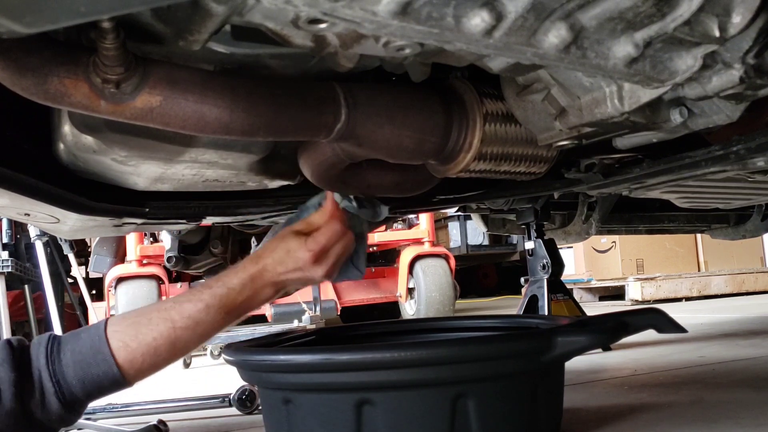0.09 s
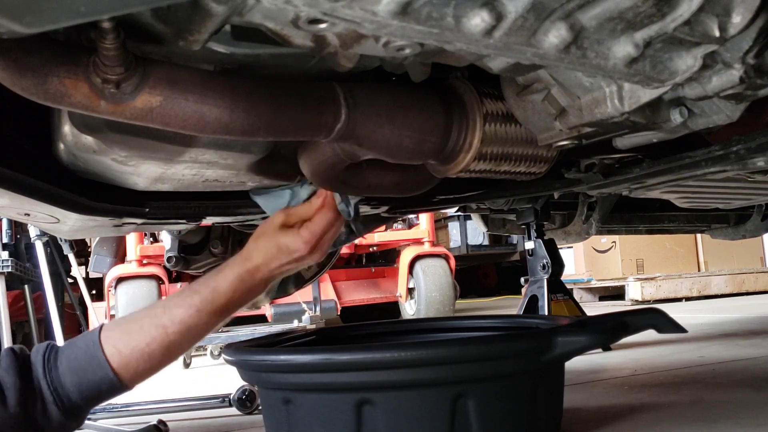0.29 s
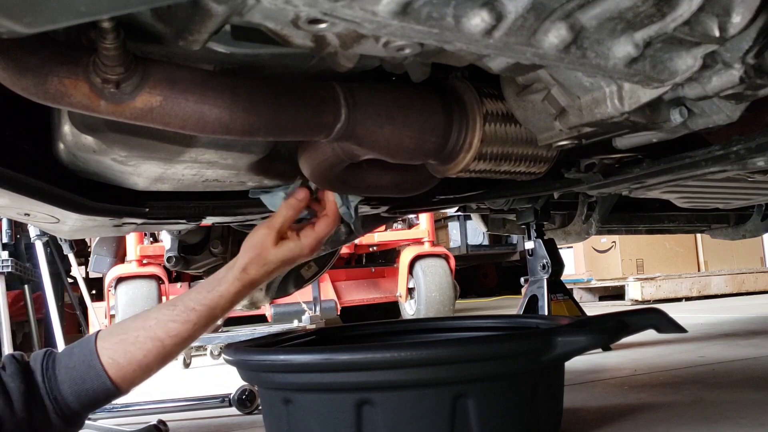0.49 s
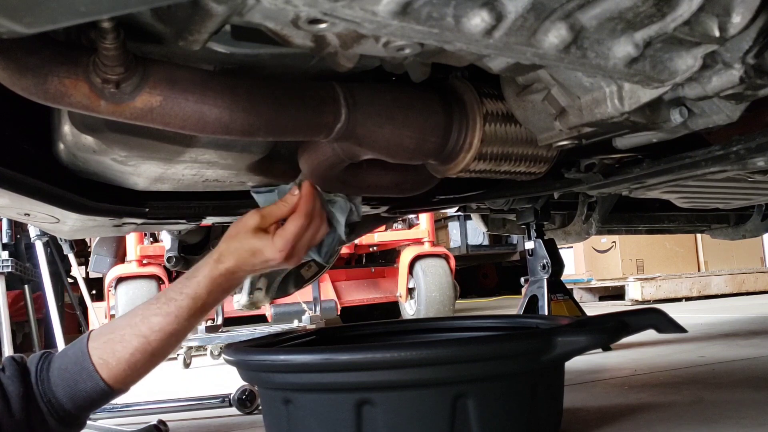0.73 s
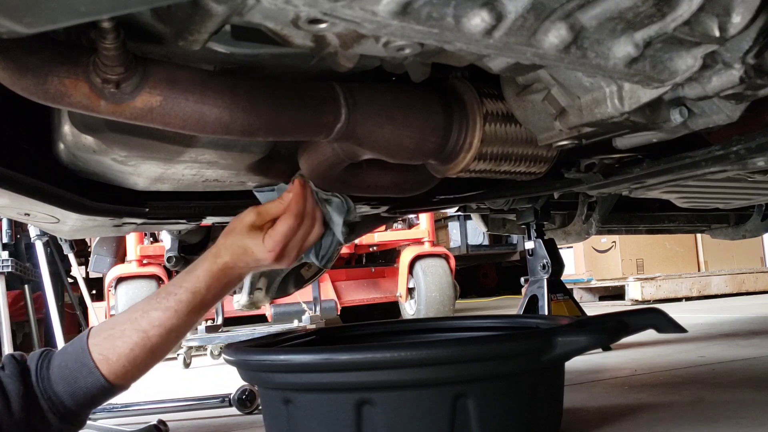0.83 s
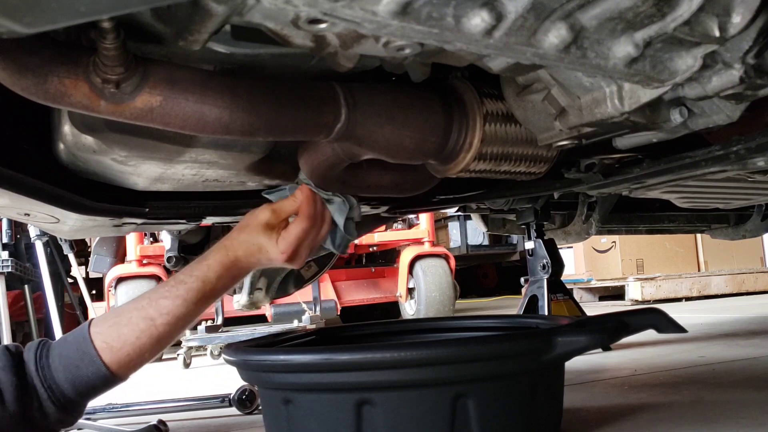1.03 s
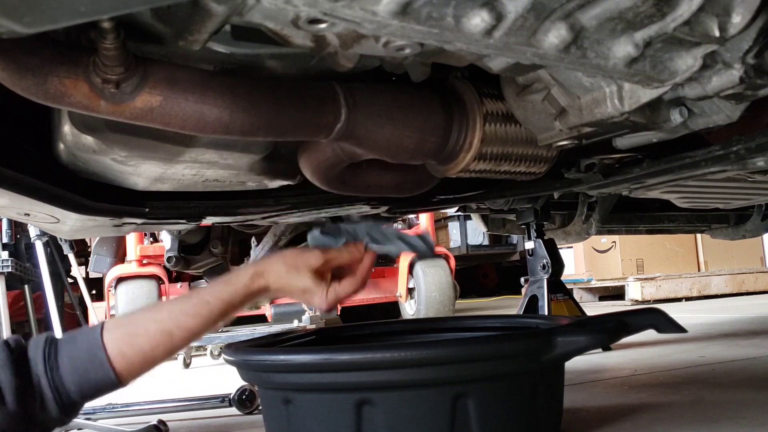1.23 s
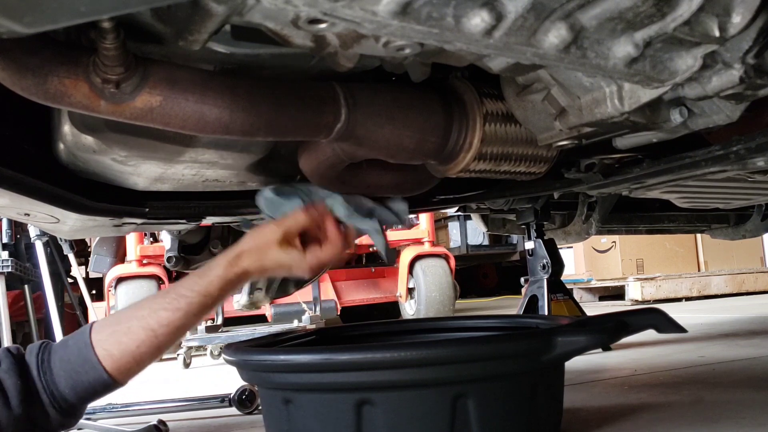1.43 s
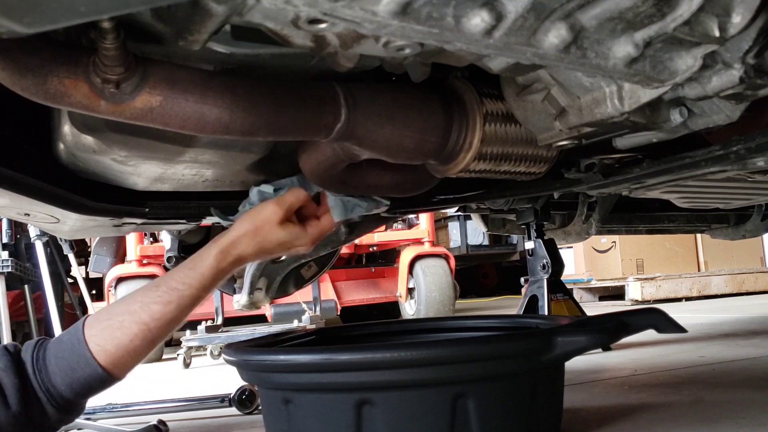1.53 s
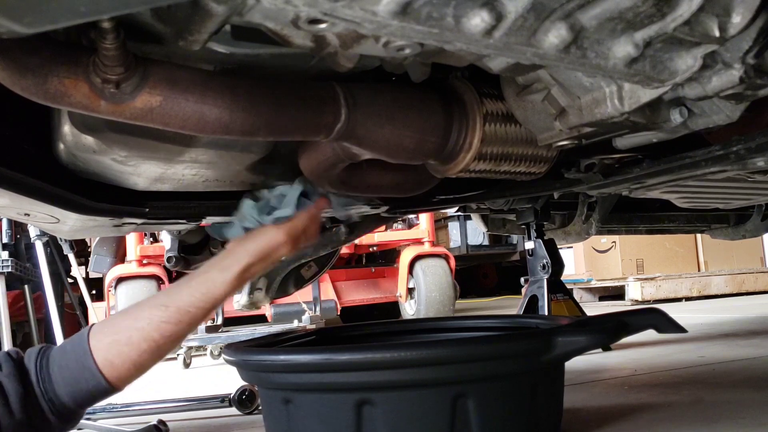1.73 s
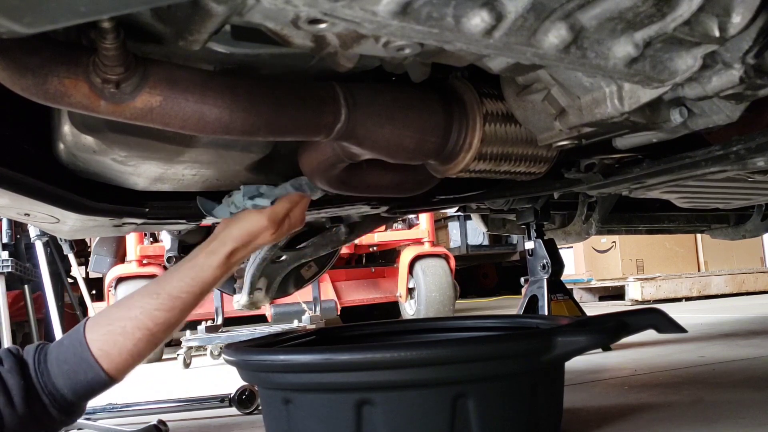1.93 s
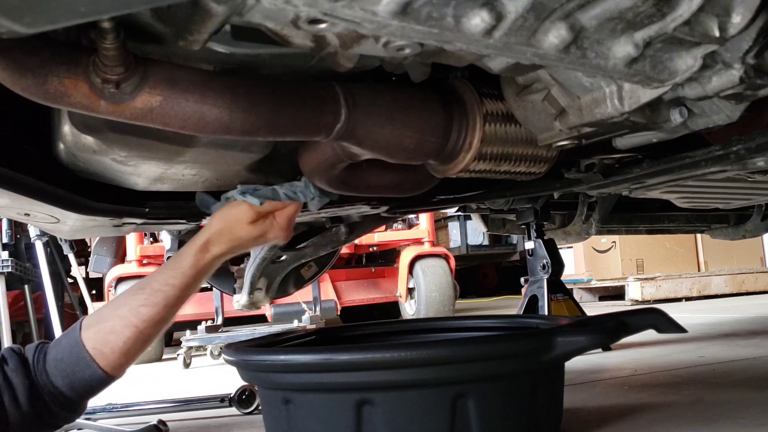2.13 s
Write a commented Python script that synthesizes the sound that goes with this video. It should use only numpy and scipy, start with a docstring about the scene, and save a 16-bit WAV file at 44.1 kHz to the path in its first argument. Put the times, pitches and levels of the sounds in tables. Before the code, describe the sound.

Soft, hissy rubbing of cloth on metal comes and goes under a car. An early hard clink stands out, with faint touches later, over low rumble and thin air, closely miked with slight garage reflections.

```python
"""A hand wipes a cloth rag to and fro over a steel oil pan under a car in a quiet garage.
The rubbing is shaped noise in hiss, scuff and dull bands, and it stirs the pan's damped modes.
One hard knock and a few light touches click and ring the pan and a slower bracket.
The underside and garage add decaying-noise reflections, different at each microphone.
A low rumble and thin air noise, both steady-coloured noise, lie beneath."""
import sys
import numpy as np
from scipy import signal
from scipy.fft import rfft, irfft, next_fast_len
from scipy.io import wavfile
from scipy.ndimage import uniform_filter1d, map_coordinates

SR = 44100
rng = np.random.default_rng(int(sys.argv[2]) if len(sys.argv) > 2 else 0)


def pcm_store(signal):
    """Save signal as 16-bit PCM."""
    levels = np.round(np.clip(np.atleast_2d(signal), -1, 1) * 32767)
    wavfile.write(sys.argv[1], SR, levels.astype(np.int16).T)


N = 97020

# Modes of the steel pan, the main one first. Each row: frequency in Hz, left level in relative dB,
# right level in relative dB, phase by which left leads in radians, T60 in seconds without the
# rag's damping.
PAN_MODES = [(1885, 0, -2, -.7, .085), (1790, -14, -14, 0, .05), (1975, -14, -15, -1, .05),
             (2374, -26, -20, -.6, .1), (2720, -18, -17, 1, .08), (2875, -13, -18, -2, .1),
             (3060, -16, -16, 0, .08), (3984, -7, -14, -.8, .075), (4300, -20, -18, 1, .06),
             (5095, -10, -10, 2.4, .07), (5602, -12, -18, 1.1, .07), (5680, -16, -14, -1, .07),
             (6740, -13, -10, .5, .07), (9354, -14, -18, -1.1, .08), (11070, -22, -11, -1.1, .08),
             (11520, -16, -7, 3.1, .07), (12420, -21, -11, -2.2, .08)]


def amp(db):
    """Decibels to amplitude."""
    return 10 ** (np.asarray(db) / 20)


def unit(x):
    """Scale to rms 1."""
    return x / np.sqrt(np.mean(x ** 2) + 1e-20)


def along(points, hz):
    """Interpolate (Hz, value) points on a log frequency axis."""
    f, v = np.transpose(points)
    return np.interp(np.log(hz + 1), np.log(f + 1), v)


def filtered(x, response):
    """Multiply the spectrum of x by a response of frequency."""
    m = next_fast_len(x.shape[-1] + 8192)
    hz = np.fft.rfftfreq(m, 1 / SR)
    return irfft(rfft(x, m) * response(hz), m)[..., :x.shape[-1]]


def coloured(x, spectrum):
    """Shape x by (Hz, dB) points, at rms 1."""
    return unit(filtered(x, lambda hz: amp(along(spectrum, hz))))


def wobble(rate):
    """Smooth random curve with rate knots a second."""
    knots = rng.standard_normal(int(N * rate / SR) + 4)
    return map_coordinates(knots, [np.arange(N) * rate / SR])


def pair(spectrum, alike):
    """Stereo noise of rms 1; alike is the correlation between the sides."""
    angle = np.arccos(alike) / 2
    a, b = rng.standard_normal((2, N))
    left = np.cos(angle) * a + np.sin(angle) * b
    right = np.cos(angle) * a - np.sin(angle) * b
    return coloured(np.array([left, right]), spectrum)


def background():
    """Low, nearly mono rumble of drifting level, and a wide, thin, steady air noise."""
    # Rumble spectrum. Each row: frequency in Hz, relative level in dB.
    rumble_spectrum = [(8.8, -48), (15, -50), (55, -0.5), (75, 3), (101, -1), (198, -16), (327, -18.5),
                       (407, -31), (500, -41.5), (650, -98), (1100, -120)]
    # Rumble level. Each row: time in seconds, level in dB.
    rumble_swell = [(0.0, -47.5), (0.04, -51), (0.59, -51), (0.75, -54.5), (0.78, -50.5), (1.57, -56),
                    (1.6, -49.5), (2.19, -50.5), (2.2, -43)]
    # Air noise spectrum. Each row: frequency in Hz, relative level in dB.
    air_spectrum = [(400, -1.5), (700, 5.5), (1300, 7), (2000, -5.5), (4000, -23), (7000, -24.5),
                    (9000, -3), (15800, -6.5)]
    rumble_alike, rumble_left_over_right_db = .95, 1.5
    air_alike, air_db = 0.1, -68

    lean = amp(rumble_left_over_right_db * np.array([[.5], [-.5]]))
    swell = amp(np.interp(np.arange(N) / SR, *np.transpose(rumble_swell)))
    rumble = pair([(6.4, -120)] + rumble_spectrum + [(700, -120)], rumble_alike)
    air = pair([(250, -63)] + air_spectrum, air_alike)
    return swell * lean * rumble + amp(air_db) * air


def space(x):
    """Direct sound plus quick reflections and a garage tail, both decaying noise."""
    near_t60_s, near_db = .025, -18  # under the car; energy over direct
    garage_t60_s, garage_db = .3, -17
    t = np.arange(SR // 2) / SR

    def tail(t60_s, db):
        """Independent left and right noise with exponential decay."""
        noise = rng.standard_normal((2, len(t))) * amp(-60 * t / t60_s)
        return amp(db) * unit(noise) / np.sqrt(len(t))

    answer = tail(near_t60_s, near_db) + tail(garage_t60_s, garage_db)
    answer[:, 0] += 1
    return signal.fftconvolve(x, answer, axes=1)[:, :N]


def ports(x):
    """Frequency-dependent level and phase differences between the microphone ports."""
    # Port balance. Each row: frequency in Hz, left over right in dB.
    left_over_right = [(300, 0), (700, -4), (1300, 0), (3000, 1), (8000, -1), (14000, -3.5)]
    # Port phase. Each row: frequency in Hz, left lead in radians.
    left_lead = [(300, -2), (1300, 1), (2000, -1.1), (4000, -1), (7000, 2.5), (10000, -2), (15000, 2.5)]
    half = np.array([[.5], [-.5]])

    def response(hz):
        """Split each difference evenly between the sides."""
        return amp(along(left_over_right, hz) * half) * np.exp(1j * along(left_lead, hz) * half)

    return filtered(x, response)


def ringing(modes, damping=1, rise_s=0.00016):
    """Stereo impulse response of modes as decaying sines; damping scales their T60."""
    t = np.arange(SR // 3) / SR
    total = 0
    for hz, left_db, right_db, lead, t60 in modes:
        envelope = amp(np.c_[[left_db, right_db]] - 60 * t / (t60 * damping))
        total = total + envelope * np.sin(2 * np.pi * hz * t + np.c_[[lead, 0]])
    return total * (1 - np.exp(-t / rise_s))


def taps():
    """Each contact chatters, clicks and rings the pan; bracket and underside build up slower."""
    # Knocks and touches. Each row: start in seconds, relative level in dB, other pan modes and
    # click over it in dB, bracket over it in dB; the click and the other pan modes each add
    # their own fixed offset.
    contacts = [(.204, -48.5, -23, -15), (.2355, -23.5, -5, -7), (0.991, -56, -20, -13),
                (1.025, -51.5, -15, -7), (1.04, -71, -22, 5), (1.117, -56, -11.5, -8),
                (1.15, -45, -13.5, -12.5), (1.198, -39, -10.5, -14), (1.61, -64, -11, -6),
                (1.737, -55.5, -11, -0.5), (1.79, -63.5, -15, 8)]
    # Bracket modes. Each row: frequency in Hz, left level in relative dB, right level in relative
    # dB, phase by which left leads in radians, T60 in seconds.
    bracket_modes = [(824, -32, -23, -1, .2), (922, -10, -3, -2.2, .2), (968, -8, -5, -2, .2),
                     (1060, -18, -13, 1, .15), (1250, -10, -8, -3, .2), (1332, -2, 1, .5, .1),
                     (1468, -3, -6, -1.5, .36), (1517, -9, -9, -1.4, .22)]
    # Click spectrum. Each row: frequency in Hz, relative level in dB.
    click_spectrum = [(300, -69), (700, -42), (1000, -21), (3000, -9.5), (8000, -2.5), (12000, -2.5),
                      (15500, -6.5)]
    # Many close modes of the underside, heard as noise. Each row: frequency in Hz, relative
    # level in dB.
    shudder_spectrum = [(500, -51), (800, -7), (1000, -2), (1500, 1), (2000, -10.5), (4000, -12),
                        (7000, -26)]
    hold_s, click_t60_s = 0.002, 0.07
    others_db, click_db = 8, 2.5
    shudder_db, shudder_t60_s, slow_rise_s = -9, .3, .011

    t, life = np.arange(SR // 8) / SR, np.arange(SR // 3) / SR
    shape = np.minimum(t / 0.0012, 1) * amp(-60 * np.maximum(t - hold_s, 0) / click_t60_s)
    shudder_shape = amp(-60 * life / shudder_t60_s) * (1 - np.exp(-life / slow_rise_s))
    main_mode, other_modes = ringing(PAN_MODES[:1], rise_s=0.0015), ringing(PAN_MODES[1:])
    bracket = ringing(bracket_modes, rise_s=slow_rise_s)
    rings, clicks = np.zeros((2, N + SR)), np.zeros((2, N + SR))
    for s, db, bright_db, bracket_db in contacts:
        start = round(s * SR)
        chatter = rng.standard_normal(len(t)) * shape ** 2
        push = .2 * chatter / np.linalg.norm(chatter)
        push[10] += 1  # the impulse itself
        body = main_mode + amp(bright_db + others_db) * other_modes + amp(bracket_db) * bracket
        ring = signal.fftconvolve(push[None], body, axes=1)
        rings[:, start:][:, :ring.shape[1]] += amp(db) * ring

        noise = rng.standard_normal(len(t)) + 0.6 * rng.standard_normal((2, len(t)))
        click = coloured(noise, click_spectrum) * shape
        clicks[:, start:][:, :len(t)] += amp(db + bright_db + click_db) * click

        shudder = coloured(rng.standard_normal((2, len(life))), shudder_spectrum) * shudder_shape
        clicks[:, start:][:, :len(life)] += amp(db + bracket_db + shudder_db) * shudder
    return rings[:, :N] + ports(clicks[:, :N])


def fibres(grain_db, patchy_db):
    """Stereo noise with a grainy, patchy level, as weave catches on metal."""
    own_share = 0.67  # power share independent at each side
    shared, own = rng.standard_normal(N), rng.standard_normal((2, N))
    mixed = np.sqrt(1 - own_share) * shared + np.sqrt(own_share) * own
    z = signal.stft(mixed, nperseg=256)[2]
    # patches over frequency and time, the same on both sides
    field = uniform_filter1d(rng.standard_normal(z.shape[1:]), size=2, axis=0)
    field = uniform_filter1d(field, size=10, axis=1)
    noise = signal.istft(z * amp(patchy_db * unit(field)), nperseg=256)[1][:, :N]
    return noise * amp(grain_db * wobble(400) + 0.78 * wobble(39.9))


def faint_rubs():
    """Faint narrow-band rubs and low hums: noise bands under flat-topped envelopes."""
    # Rubs and hums. Each row: middle in seconds, length in seconds, centre in Hz, relative
    # level in dB.
    bands = [(.69, 0.087, 671, -62), (.81, 0.022, 453, -62.5), (1.502, .05, 2900, -71),
             (1.59, 0.073, 2850, -68.5), (1.597, .06, 1770, -65.5), (1.742, 0.013, 1700, -56),
             (1.883, 0.032, 2920, -72), (1.991, 0.088, 2850, -72.5), (2.163, 0.051, 2800, -77)]
    width = .09  # half-width to 1/e, share of the centre frequency
    t = np.arange(N) / SR
    weave = fibres(grain_db=2.0, patchy_db=2.0)
    total = 0
    for mid, length, hz, db in bands:
        band = unit(filtered(weave, lambda f: np.exp(-((f / hz - 1) / width) ** 2)))
        total = total + amp(db) * np.exp(-(2 * (t - mid) / length) ** 4) * band
    return total


def rag():
    """Strokes set the level of hiss, scuff and dull rubbing noise and of the stirred pan modes."""
    # Rag strokes, a list for each stretch. Each row: time in seconds, relative hiss level in dB,
    # then over the hiss in dB: scuff of the middle band, ring of the pan, dull body.
    strokes = [
        [(0.0, -69.5, -11, -23, -6), (0.014, -79.5, -3, -15, 1.5), (0.044, -77, -6, -21, 0.5),
         (0.052, -73, -7, -32, -16), (0.09, -54.5, -17.5, -25, -15.5), (0.098, -62.5, -14.5, -18, -24),
         (0.136, -57.5, -9, -19, -12.5), (0.152, -65.5, -12.5, -27, -8), (0.21, -55, -10, -9, -20.5),
         (0.225, -78.5, 4.5, 11, 11)],
        [(0.29, -62.5, 10, 6, 2), (0.308, -55.5, -15, -25, -5.5), (0.434, -66, -15, -0.5, -4),
         (0.51, -66.5, -10, -24, -4), (0.544, -83, -2, -7, 2), (0.572, -66.5, -11, -27, -14),
         (0.634, -43.5, -8.5, -11, -17), (0.692, -52, -2, -3.5, -8), (0.802, -44.5, -5.5, -17.5, -12.5),
         (0.93, -88, 2, 2, 9)],
        [(0.93, -82, 2, -6, 8), (0.974, -58, -6.5, -13, -12), (1.004, -51.5, -3.5, -5, -16),
         (1.062, -87, 4, 6, 10), (1.126, -83.5, 0, 4, 10), (1.17, -45.5, -7, -9, -19.5),
         (1.214, -39, -9, -20, -22), (1.274, -90.5, 5, -9, 18), (1.328, -87.5, 4.5, -6, 14.5),
         (1.4, -62, -16, -33, -28)],
        [(1.4, -66, -14, -28, -21), (1.412, -67.5, -10.5, -20.5, -8), (1.448, -62, -16, -30, -17),
         (1.478, -56, -12.5, -18, -14.5), (1.522, -53, -5, -16, -17), (1.544, -57.5, -5.5, -8, -9.5),
         (1.598, -57, -3, -9.5, -9.5), (1.674, -70, -4, -2, -5), (1.714, -57.5, -13, -13.5, -28),
         (1.731, -61.5, -4.5, -3, -26)],
        [(1.737, -44.5, -12, -19, -26), (1.775, -50, -3, -8, -10), (1.845, -63, -6.5, -5, -7),
         (1.889, -60, -5.5, -10, -11), (1.931, -74.5, -8, -4, -16), (1.977, -65, -7.5, -13, -7),
         (2.045, -70.5, -12, -11, -9.5), (2.087, -67, -10, -25, -6), (2.157, -62, -10, -11, -21),
         (2.2, -57.5, -8, -12, -9.5)],
    ]
    # Hiss spectrum. Each row: frequency in Hz, relative level in dB per Hz.
    hiss_spectrum = [(3530, -40), (6000, -11.5), (7110, -11.5), (8260, -2.5), (9640, -1.5), (10700, -0.5),
                     (15100, -3.5), (15800, -4.5)]
    # Scuff spectrum. Each row: frequency in Hz, relative level in dB.
    scuff_spectrum = [(1500, -28.5), (2000, -8), (2800, -2.5), (4000, -6.5), (5500, -7), (7000, -11),
                      (8500, -19)]
    # Dull body spectrum. Each row: frequency in Hz, relative level in dB per Hz.
    body_spectrum = [(110, -29), (180, -0.5), (330, -1), (450, -8), (700, -6), (950, -2.5), (1300, -1),
                     (1700, -5.5), (2200, -29)]
    rub_damping = .42  # the rag shortens the ring

    s, *columns = np.transpose(np.vstack(strokes))
    t = np.arange(N) / SR
    level_db, scuff_db, ring_db, body_db = [np.interp(t, s, c) for c in columns]

    rub = fibres(grain_db=3.5, patchy_db=1.5)[:1]
    ring = signal.fftconvolve(rub, ringing(PAN_MODES, rub_damping), axes=1)[:, :N]
    ring = coloured(ring, [(2000, 3.5), (12000, -1)])

    hiss = coloured(fibres(grain_db=1.0, patchy_db=1.5), hiss_spectrum)
    scuff = coloured(fibres(grain_db=0.5, patchy_db=1.2), scuff_spectrum)
    body = coloured(fibres(grain_db=2.0, patchy_db=1.6), body_spectrum)
    cloth = hiss + amp(scuff_db) * scuff + amp(body_db) * body
    return ports(amp(level_db) * cloth + faint_rubs()) + amp(level_db + ring_db) * ring


def scene():
    """Rag and taps in the reflecting space, over the background."""
    return space(rag() + taps()) * np.sqrt(2) + background()


def record(dry):
    """Cut everything from the band limit up."""
    top_hz = 15800
    return filtered(dry, lambda hz: hz < top_hz)


dry = scene()
out = record(dry)
pcm_store(out)
```